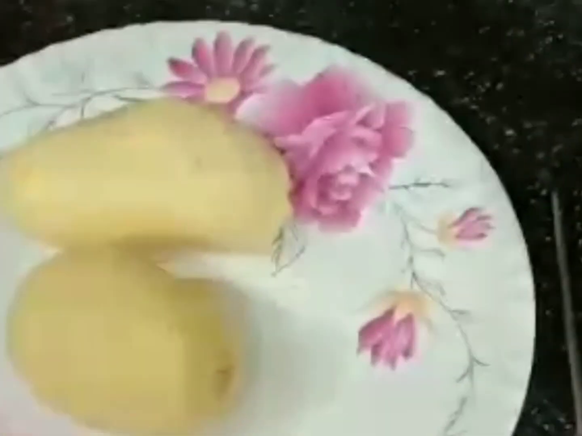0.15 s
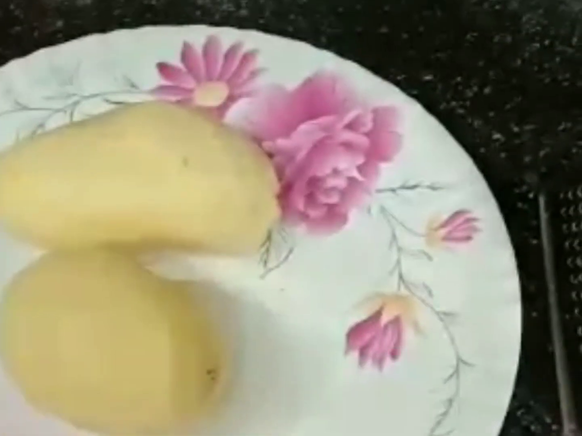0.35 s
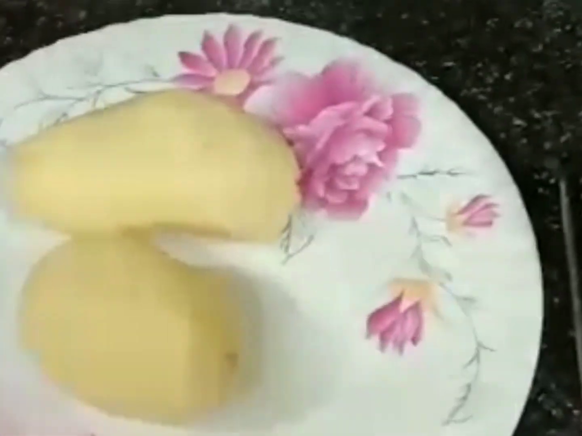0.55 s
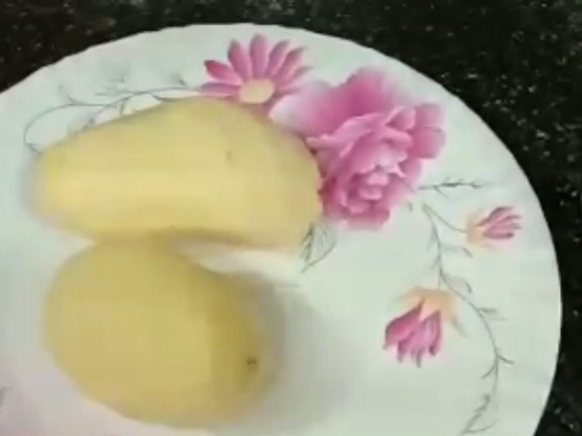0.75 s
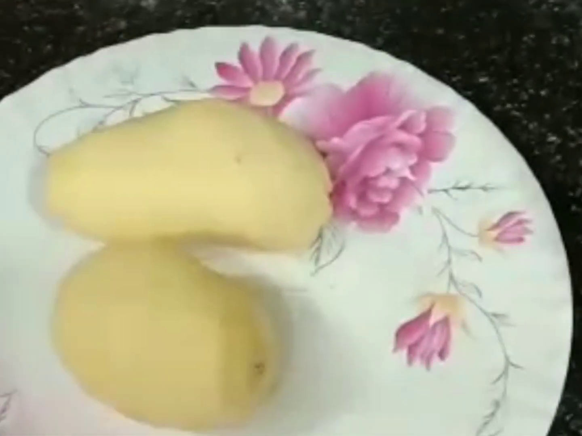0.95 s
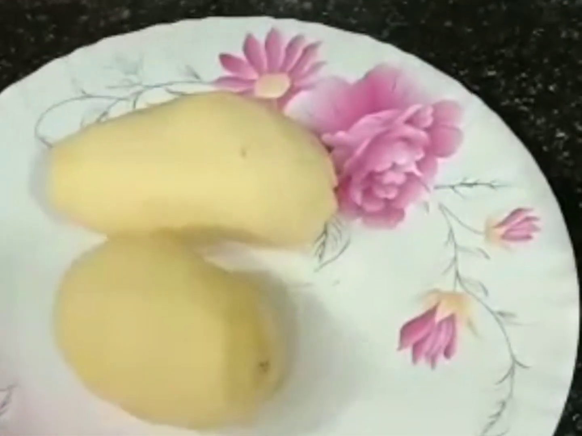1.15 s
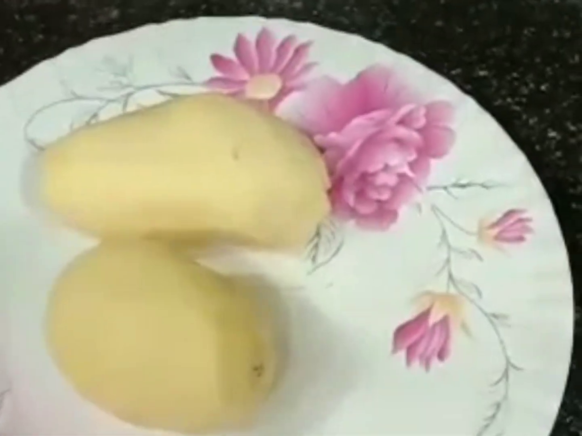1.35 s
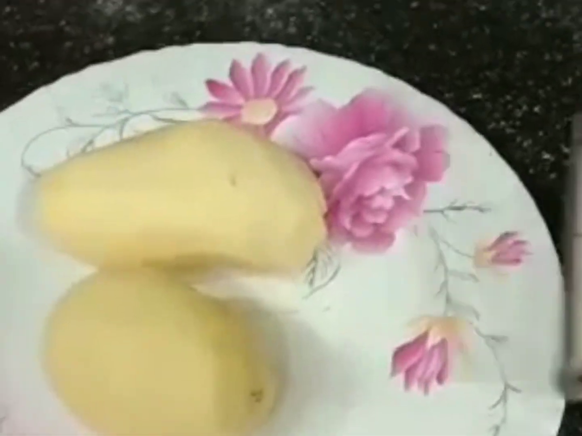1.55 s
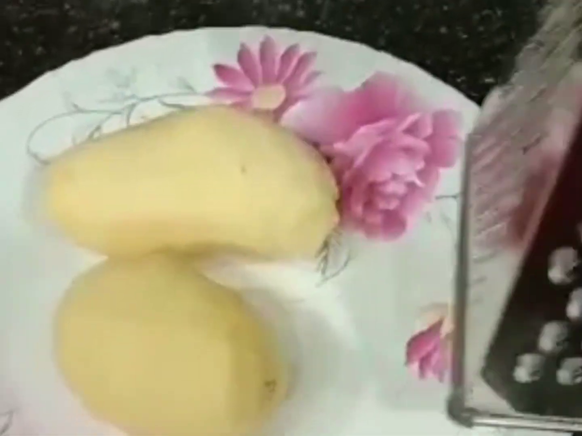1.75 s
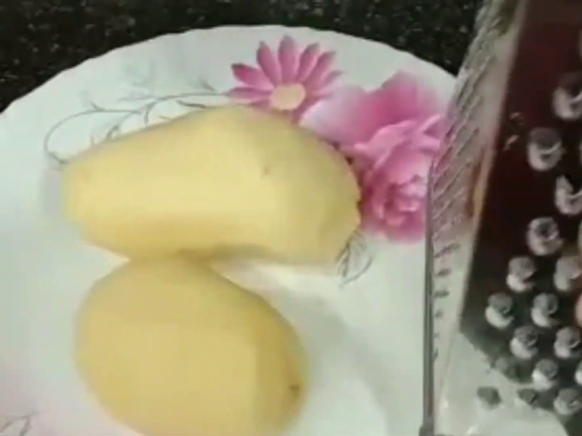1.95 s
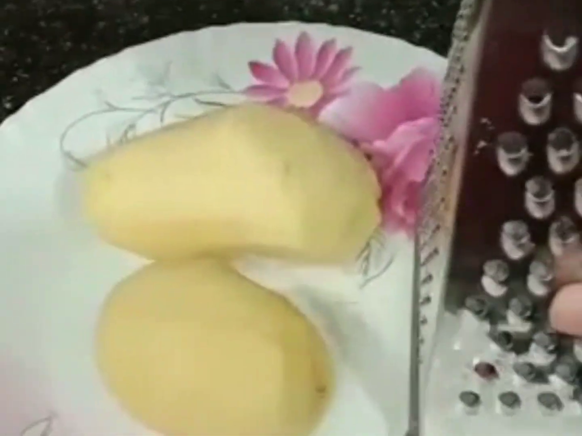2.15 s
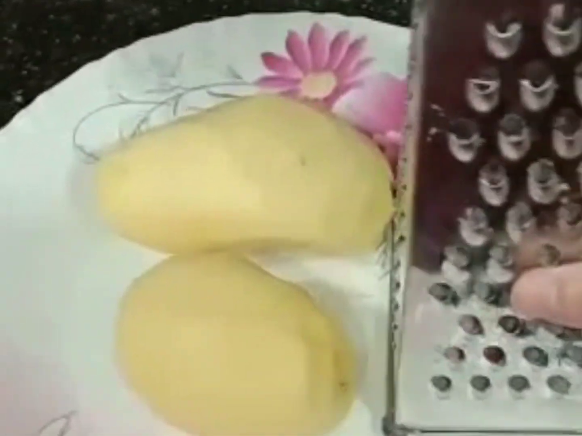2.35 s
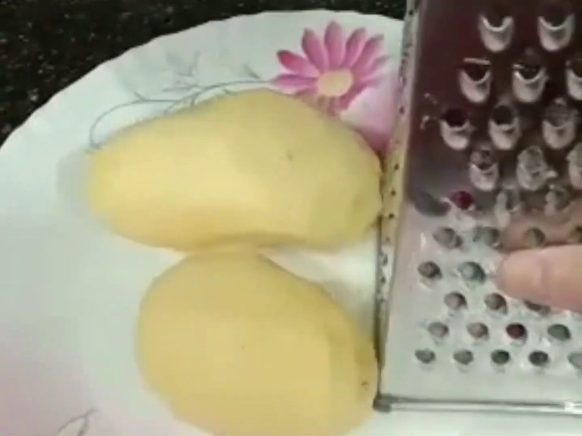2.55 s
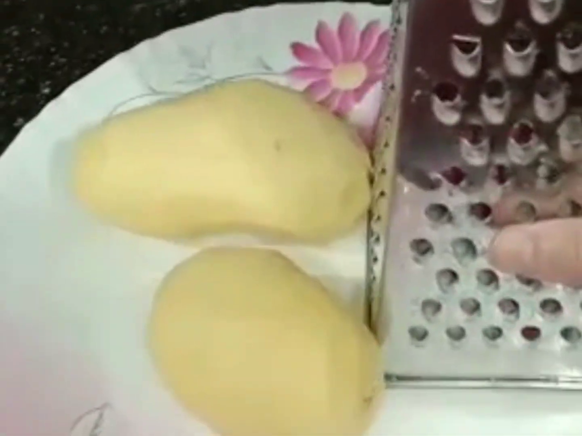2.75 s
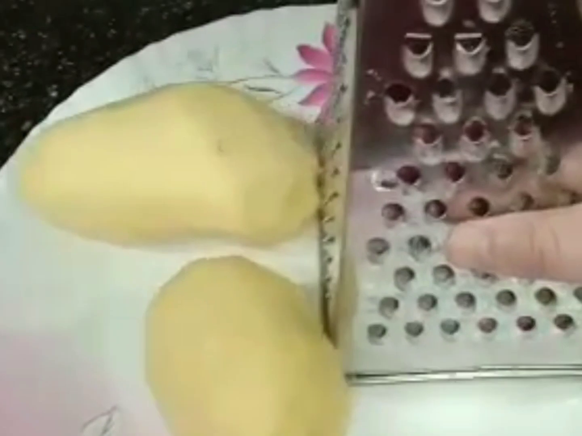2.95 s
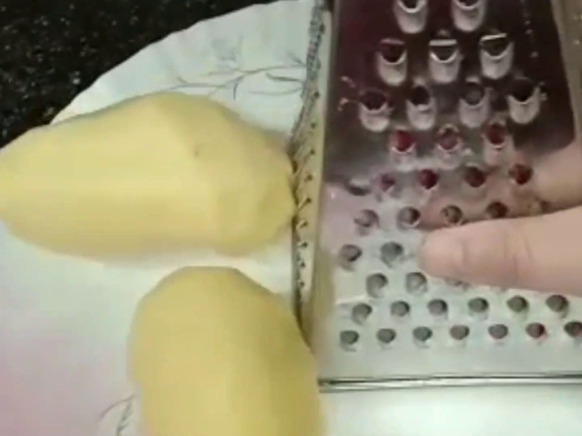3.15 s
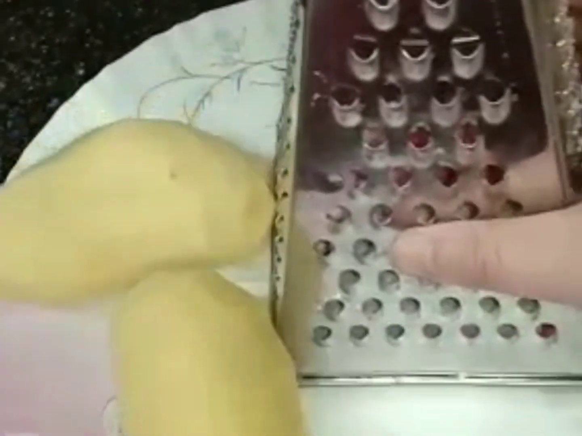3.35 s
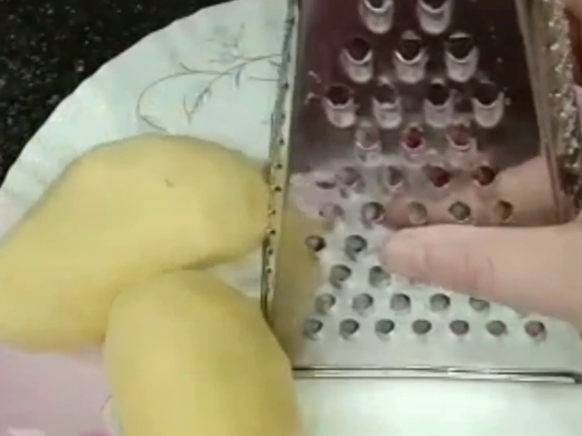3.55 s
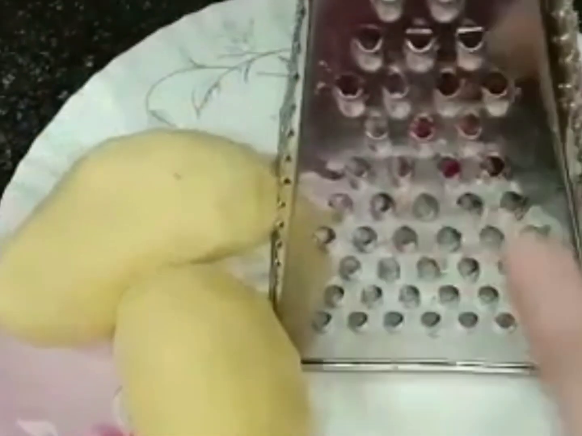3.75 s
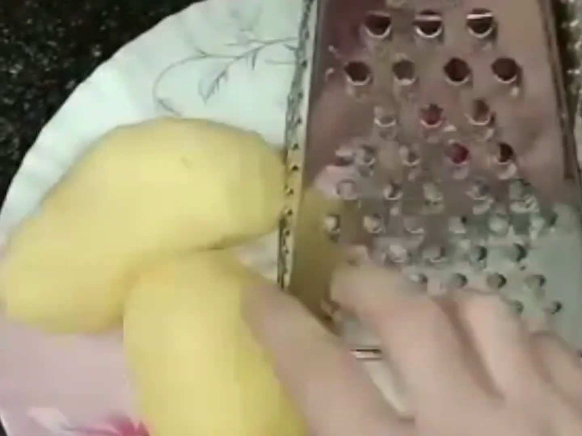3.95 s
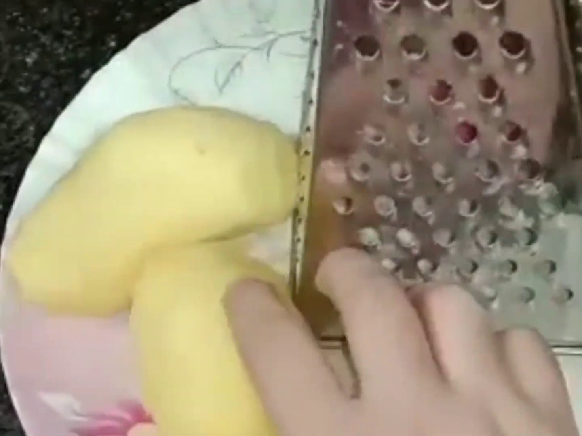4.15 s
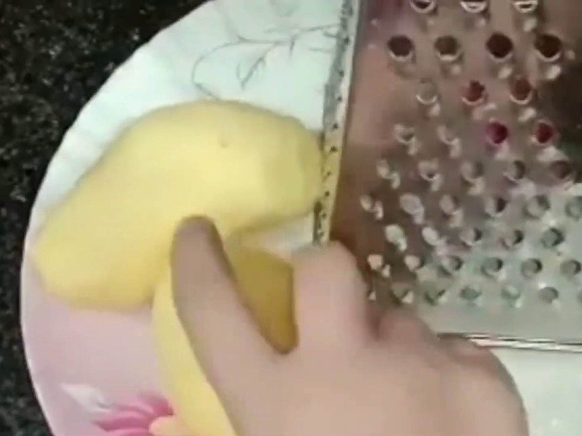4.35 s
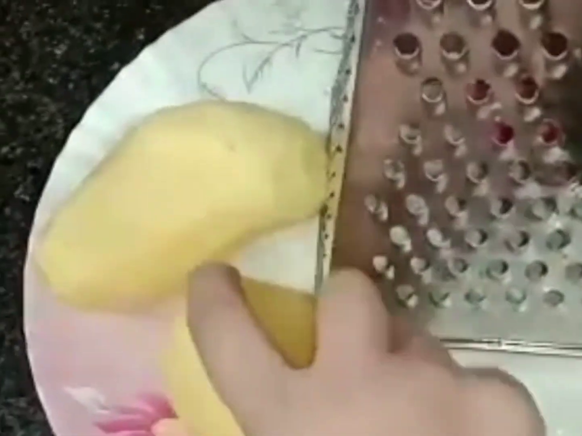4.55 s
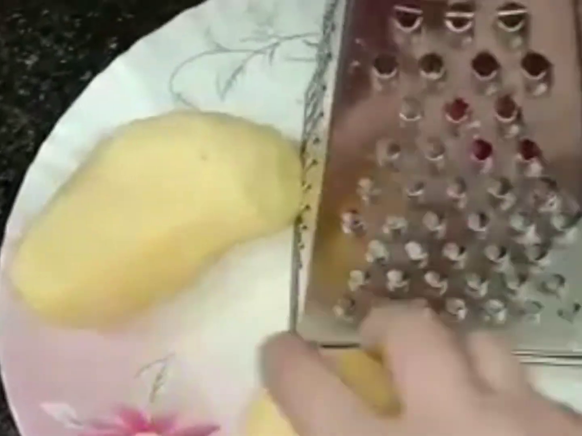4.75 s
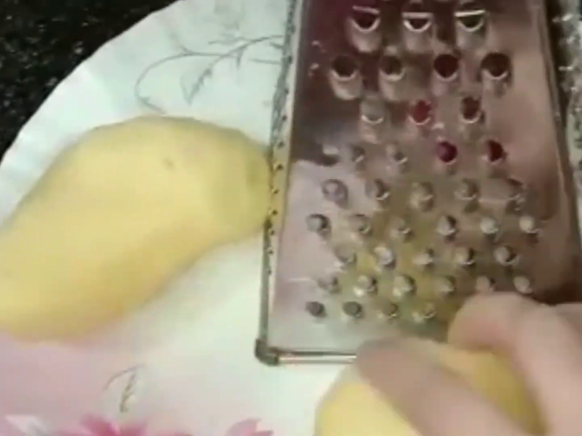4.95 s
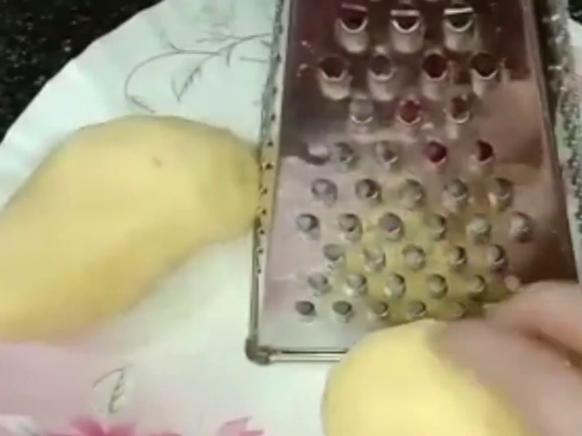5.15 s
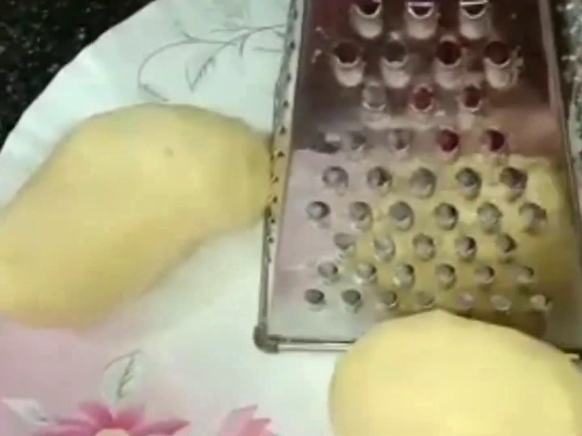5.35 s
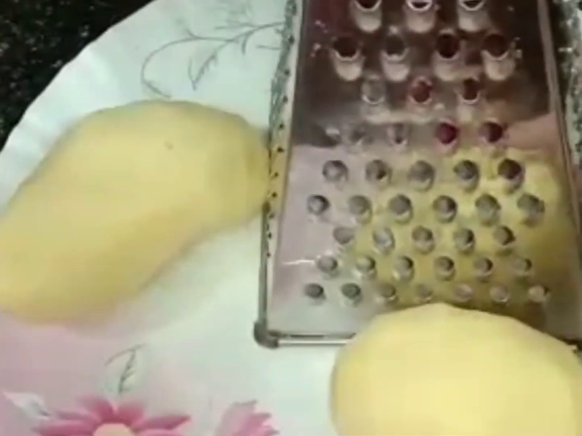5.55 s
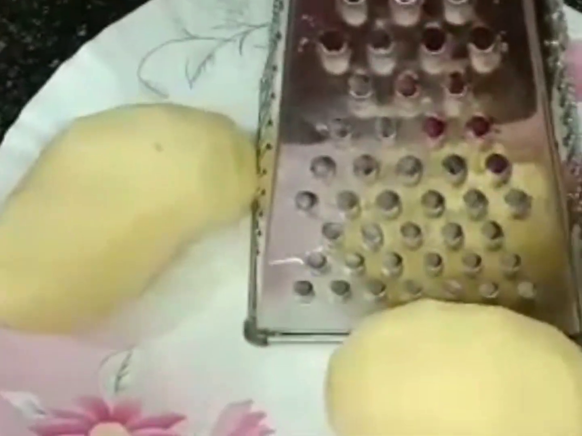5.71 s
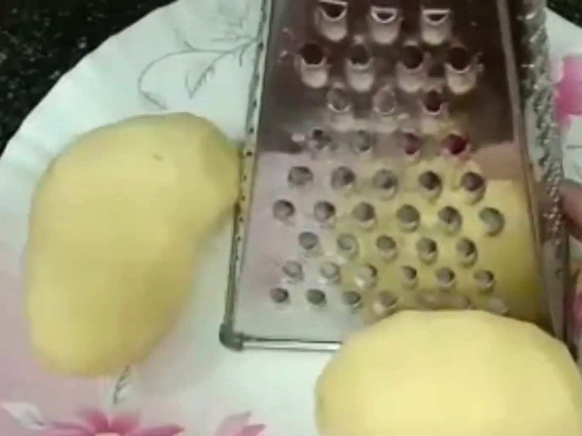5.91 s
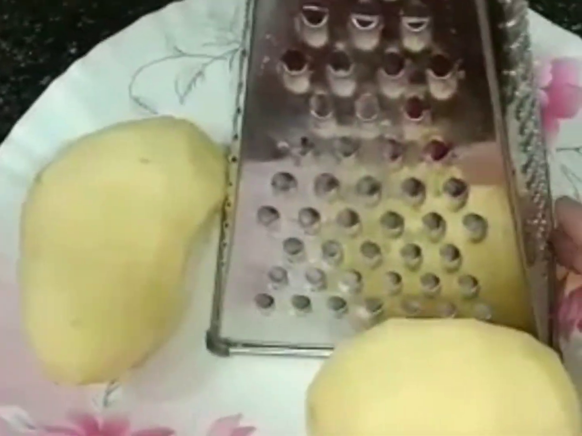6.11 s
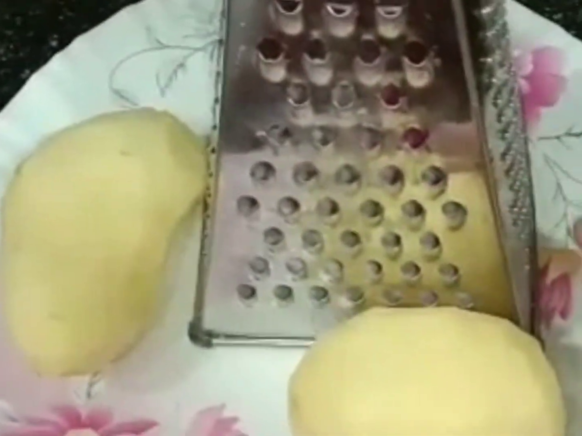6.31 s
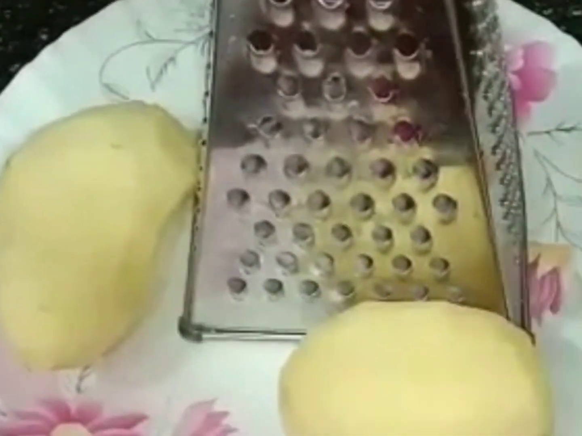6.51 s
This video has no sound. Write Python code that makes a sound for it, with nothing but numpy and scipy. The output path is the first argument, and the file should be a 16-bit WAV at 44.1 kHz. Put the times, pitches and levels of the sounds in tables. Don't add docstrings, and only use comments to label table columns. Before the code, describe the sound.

Close in a small hard kitchen, faint hiss and a few soft bumps and rubs come first. Then a hollow steel grater lands on a ceramic plate with two loud bright clanks, rattling on, clattering and scraping across the glaze. After it stops, a lighter metallic clatter, small taps and gentle rubs of skin and potato follow, fading to quiet. The sound is nearly mono with short room reflections.

```python
import sys
import numpy as np
from scipy import signal
from scipy.fft import rfft, irfft
from scipy.io import wavfile
from scipy.ndimage import uniform_filter1d

SR = 44100
rng = np.random.default_rng(int(sys.argv[2]) if len(sys.argv) > 2 else 0)


def field_ratio(decibels):
    return 10 ** (np.asarray(decibels, dtype=float) / 20)


def int16_out(signal):
    q = np.round(np.clip(np.atleast_2d(signal).T, -1, 1) * 32767)
    wavfile.write(sys.argv[1], SR, q.astype(np.int16))


N = 290028


def rms_one(x):
    return x / np.sqrt(np.mean(x ** 2) + 1e-30)


def band(x, low_hz, high_hz):
    return signal.sosfilt(signal.butter(2, [low_hz, high_hz], "band", fs=SR, output="sos"), x)


def ring(x, hz, t60):
    radius = field_ratio(-60 / (t60 * SR))
    angle = 2 * np.pi * hz / SR
    return signal.lfilter([0, np.sin(angle)], [1, -2 * radius * np.cos(angle), radius ** 2], x)


def wander(per_s):
    knots = rng.standard_normal(200)
    return np.interp(np.arange(N) * per_s / SR, np.arange(200), knots)


def grains(per_s, spread_db):
    sizes = field_ratio(spread_db * np.minimum(rng.exponential(1, N), 4.5))
    signs = rng.choice([-1, 1], N)
    return rms_one(sizes * signs * (rng.random(N) < per_s / SR))


def crack(force, low_hz, high_hz):
    return band(force, low_hz, high_hz) / np.sqrt(2 * (high_hz - low_hz) / SR)


def spread(level_db, focus):
    away = np.arange(4)[:, None] - focus
    loss_db = np.where(away < 0, 12.5, 7.5)
    rounding = 0.4
    return field_ratio(level_db - (np.hypot(away, rounding) - rounding) * loss_db)


def levels(strokes):
    gain, t = np.zeros((4, N)), np.arange(N) / SR
    for s, level_db, focus, rise_s, fall_s in strokes:
        at = slice(max(round((s - 2 * rise_s) * SR), 0), round((s + 2 * fall_s) * SR))
        loss_db = 30 * np.maximum((s - t[at]) / rise_s, (t[at] - s) / fall_s)
        gain[:, at] += spread(level_db - loss_db, focus)
    return uniform_filter1d(gain, size=400, axis=1)


def sudden(rows):
    return [(s, level_db, focus, 0.012, fall_s) for s, level_db, focus, fall_s in rows]


# low edge in Hz, high edge in Hz, level of the unrung crack in dB.
REGISTERS = [(120, 260, -3), (260, 900, 0), (900, 2250, .5), (2500, 8000, 1)]


def contacts(events):
    force, age = np.zeros((4, N)), np.arange(5000) / SR
    grit = grains(14000, spread_db=-2.0)
    register = np.arange(4)
    counter_loss_db = 5 * (register == 0)
    for s, top_db, focus, narrow_db, chatter_s in events:
        at = round(s * SR)
        envelope = np.exp(-age / max(chatter_s, 3e-4)) * (1 - np.exp(-age / 0.0006))
        burst = grit[at:at + len(age)] * envelope
        peaks_db = top_db - narrow_db * (register - focus) ** 2 - counter_loss_db
        for f, peak_db, (low_hz, high_hz, _) in zip(force, peaks_db, REGISTERS):
            f[at:at + len(age)] += field_ratio(peak_db + 1.0) * burst / np.abs(crack(burst, low_hz, high_hz)).max()
    return force


def notes(rows, t60):
    out, age = np.zeros(N), np.arange(SR // 3) / SR
    for s, hz, db in rows:
        at = round(s * SR)
        note = rms_one(ring(rng.standard_normal(len(age)), hz, 0.075))
        out[at:at + len(age)] += (field_ratio(db - 60 * age / t60) * note)[:N - at]
    return out


def coloured(spectrum):
    hz, level_db = np.transpose(spectrum)
    grid = np.log(np.fft.rfftfreq(N, 1 / SR) + 1)
    gain = field_ratio(np.interp(grid, np.log(hz), level_db))
    return rms_one(irfft(rfft(rng.standard_normal(N)) * gain, N))


# frequency in Hz, density in dB per Hz.
HUSH = [(18, -76), (30, -44.5), (56, -2), (85, 0.5), (292, -14), (389, -14), (492, -16.5), (639, -17),
        (691, -25), (787, -17.5), (1260, -25.5), (1550, -24.5), (5170, -27.5), (8280, -33), (15500, -41)]
# frequency in Hz, density in dB per Hz.
HUSH_SIDE = [(15, -50), (25, -18), (120, -7), (263, -7.5), (309, -11), (1260, -7), (1560, -8.5),
             (14800, -23.5), (16000, -22)]
# centre in Hz, width in Hz, level in dB.
HUMS = [(675.2, 22, -85), (1236, 85, -81), (5960, 860, -87), (7200, 500, -96.5), (14940, 1800, -87)]


def hush():
    mid = field_ratio(-70.5) * coloured(HUSH)
    for hz, width_hz, level_db in HUMS:
        hum = band(rng.standard_normal(N), hz - width_hz / 2, hz + width_hz / 2)
        mid = mid + field_ratio(level_db) * rms_one(hum)
    return mid + field_ratio(-78.5) * coloured(HUSH_SIDE) * np.array([[1], [-1]])


# start in seconds, peak in dB, focus register,
# narrowness in dB per register squared, chatter time in seconds.
RATTLES = [
    (0.591, -63, 2.0, 2.5, 0.0375),
    (3.494, -42.5, .9, 8.5, 0.0107),
    (3.917, -30, 2.567, 4.5, 0.0157),
    (3.948, -46.5, 2.41, 4.5, 0.014),
    (4.478, -62, 2.64, 0.5, 0.0116),
    (4.512, -49, 3.27, 10, 0.0195),
    (4.973, -45, 1.63, 13.5, 0.0227),
    (5.181, -36.5, 3.1, 7, 0.0153),
    (5.411, -48, 3.24, 3.5, 0.0283),
]


def rattles():
    return contacts(RATTLES)


# start in seconds, frequency in Hz, level in dB.
PINGS = [(.755, 644.7, -57), (.76, 1251, -48.5), (.947, 1212, -47), (.96, 6170, -61), (2.1, 734.6, -36),
         (2.1, 2967, -28.5), (2.36, 576.4, -29), (2.36, 807, -50.5), (2.87, 7216, -32), (2.87, 6323, -35),
         (3.17, 195, -61), (3.497, 480, -59), (3.92, 1306, -37.5), (4.48, 1273, -52), (4.48, 3675, -62),
         (4.51, 5950, -53), (4.597, 784, -50.5), (4.63, 367.3, -42), (4.8, 3474, -68), (4.975, 1278, -53),
         (5.05, 2888, -69.5), (5.185, 1279, -49), (5.183, 2235, -51), (4.976, 2054, -58),
         (5.413, 2350, -65), (5.45, 1332, -56), (5.6, 3504, -67.5), (5.69, 1760, -62.5),
         (5.775, 989, -52.5)]


def pings():
    return notes(PINGS, t60=0.13)


# start in seconds, peak in dB, focus register,
# narrowness in dB per register squared, chatter time in seconds.
TAPS = [(0.762, -63, 2.35, 0.5, 0.0041), (0.846, -45.5, 2.62, 5.5, 0.00296),
        (1.165, -40.5, 0.854, 10.5, 0.0075), (2.096, -11.5, 3.237, 2.5, 0.001895),
        (2.36, -9.5, 2.044, 6, 0.00343), (2.433, -18.5, 2.95, 5, 0.00215), (2.465, -24, 1.07, 9, 0.00234),
        (2.539, -26, 2.3, 8.5, 0.00616), (2.767, -24.5, 2.1, 5.5, 0.0061), (2.855, -33, 1.5, 2.28, 0.0083),
        (2.867, -26.5, 2.23, 4.5, 0.0063), (2.914, -18.5, 1.72, 14.0, 0.00078),
        (2.947, -31.5, 1.56, 10.5, 0.0045)]


def taps():
    return contacts(TAPS)


# peak time in
# seconds, level in dB, focus register, time of a 30 dB rise in seconds, time of a 30 dB fall in seconds
RUBS = [(.616, -73.5, 1.6, -3.02, .15), (.86, -58, 1.2, .13, 0.0476), (1.17, -53, 1.2, .07, .09),
        (1.165, -61, 3.2, .1, .06), (1.12, -63.5, 2.32, 0.1461, 0.0767),
        (1.97, -71, 3.5, .45, .6)  , (2.35, -48.5, 2.24, 0.1288, 0.5343), (3.678, -73.5, 3.05, 0.06, 0.01),
        (4.27, -65, .9, .1, .12), (4.52, -60.5, 2.64, -0.22, 0.05), (4.77, -68, 3.2, .25, .35),
        (4.18, -65, 2.47, .07, .22), (5.95, -63.5, 2.3, 0.0335, -0.0383), (5.62, -72, 3.22, 0.19, 0.25),
        (5.728, -50, 2.73, 0.0513, 0.0728), (5.85, -70, 2.31, 0.08, .2), (6.5, -66, 2.634, 0.2132, 1)]
# start in seconds, level in dB, focus register,
# time to lose 30 dB in seconds.
DRAGS = [(.765, -63, 2.43, 0.03), (.95, -53, .8, .15), (3.5, -54, 1.503, 0.1578),
         (3.955, -51.5, 2.14, 0.1566), (4.485, -63.5, 2.24, 0.12), (4.6, -50.5, 3, 0.0327),
         (4.632, -48, 0.94, 0.0982), (4.978, -55.5, 2.17, 0.1143), (5.195, -54.5, 2.2, 0.069),
         (5.417, -57, 1.9, 0.0865), (5.776, -49.5, 0.887, 0.0525), (5.91, -59, 1.274, 0.1562)]


def hands():
    return levels(RUBS + sudden(DRAGS)) * grains(9000, spread_db=2.5)


# start in seconds, peak in dB, focus register,
# narrowness in dB per register squared.
TICKS = [
    (0.81, -43, 1.7, 4.0),
    (0.945, -41.5, 0.78, 1.5),
    (3.662, -59, 2.8, 4.5),
    (4.564, -42, 3.43, 6.5),
    (4.597, -35, 3.35, 18),
    (4.628, -45.5, 0.54, 0),
    (5.462, -54.5, 2.63, 4.5),
    (5.772, -39.5, 1.27, 2.5),
    (5.908, -52, 1.27, 9.5),
]


def ticks():
    return contacts([(*tick, 0.00134) for tick in TICKS])


# start in seconds, frequency in Hz, peak in dB.
THUDS = [(.85, 260.3, -58), (.95, 280, -46), (1.164, 290, -47), (2.104, 125, -39.5), (2.375, 119.3, -36),
         (2.79, 130, -42.5), (3.497, 205.2, -50), (4.269, 336.4, -60), (4.64, 259, -54.5),
         (4.99, 296.6, -55), (5.44, 151, -55), (5.78, 198, -58)]


def thuds():
    out, age = np.zeros(N), np.arange(SR // 4) / SR
    rise_s, t60_s = 0.011, 0.12
    for s, hz, db in THUDS:
        at = round(s * SR)
        envelope = field_ratio(db - 60 * age / t60_s) * (1 - np.exp(-age / rise_s))
        out[at:at + len(age)] += envelope * np.sin(2 * np.pi * hz * age)
    return out


def glints(force):
    t60_s, count = 0.045, 16
    pitches = np.geomspace(3100, 7500, count) * rng.uniform(0.98, 1.02, count)
    unit = np.sqrt(t60_s * SR / 27.6 * count)
    rung = sum(ring(force * field_ratio(5.5 * wander(28)) + 1e-18, hz, t60_s) for hz in pitches)
    return field_ratio(-7.5) / unit * rung


# start in seconds, frequency in Hz, level in dB.
SINGS = [(2.1, 152, -44.5), (2.37, 152.4, -41), (2.56, 142.7, -46.5), (3.07, 7567, -50),
         (3.12, 2085, -49.5), (3.55, 288.3, -54.5), (3.925, 263.8, -50.5), (4.16, 3648, -65),
         (4.6, 7200, -68), (4.72, 4836, -73), (4.75, 4225, -71), (4.79, 6120, -65.5), (5.182, 2973, -54.5),
         (5.19, 1546, -50.5), (5.19, 250, -62.5), (5.85, 5900, -74.5), (5.86, 4300, -67),
         (5.91, 1001, -58.5), (6.46, 3350, -68.5), (6.48, 5140, -68.5)]


def sings():
    return notes(SINGS, t60=0.23)


# start in seconds, level in dB, focus register,
# time to lose 30 dB in seconds.
SHIVERS = [
    (2.106, -31, 1.7, 0.2229),
    (2.368, -28.5, 1.88, 0.1612),
    (2.44, -34.5, 1.676, 0.2413),
    (2.545, -46.5, 1.57, 0.2334),
    (2.775, -44, 0.523, 0.421),
    (2.87, -43.5, 0.547, 0.248),
]


def shivers():
    return levels(sudden(SHIVERS)) * grains(9000, spread_db=1.5) * field_ratio(-1.5)


# time in seconds, pressure in dB, focus register.
SLIDE = [
    (2.58, -55.5, 2.83),
    (2.66, -49.5, 2.475),
    (2.76, -43, 2.79),
    (2.87, -37.5, 2.437),
    (2.95, -38, 2.425),
    (3.02, -45, 2.417),
    (3.14, -43.5, 2.289),
    (3.391, -57.5, 2.07),
    (3.442, -73, 1.61),
]


def slide():
    s, pressure_db, focus = np.transpose(SLIDE)
    t = np.arange(N) / SR
    push = spread(np.interp(t, s, pressure_db, -200, -200), np.interp(t, s, focus))
    return push * grains(7000, spread_db=2.7) * field_ratio(-4)


def body(force, modes, low_hz, high_hz, crack_db):
    click = signal.unit_impulse(SR // 2)
    power, rung = 0, 0
    for hz, db, t60 in modes:
        power = power + np.sum((field_ratio(db) * ring(click, hz, t60)) ** 2)
        rung = rung + field_ratio(db) * ring(force * field_ratio(3.8 * wander(22)) + 1e-18, hz, t60)
    rung = band(rung, low_hz / 1.5, high_hz * 1.757) / np.sqrt(power)
    return 0.541 * (rung + field_ratio(crack_db) * crack(force, low_hz, high_hz))


# frequency in Hz, level in dB, t60 in seconds.
COUNTER = [(125, -8, 0.24), (152, 1.5, 0.19), (187, -4, 0.12)]
# frequency in Hz, level in dB, t60 in seconds.
PLATE = [(308, -6, 0.09), (387, -2.5, 0.064), (443.6, -2.5, 0.15), (507, -6.5, 0.095), (586, -2.5, 0.13),
         (672, 3.5, .07), (752.4, 5, 0.11), (865.3, 13, 0.03)]
# frequency in Hz, level in dB, t60 in seconds.
WALLS = [(951.2, -1, 0.017), (1185, -9.5, 0.045), (1229.6, -10, 0.11), (1289.7, -6.5, 0.14),
         (1313.9, -2, 0.11), (1466.4, -10.5, .1), (1570.5, -15, 0.2), (1774, -11.5, 0.041),
         (1922.2, -6.5, 0.045), (1994, -6, 0.083), (2124.8, -4.5, .07), (2189.5, -10, .07),
         (2444.3, -3, 0.032), (2350, -8, .06), (2633, -9.5, 0.1), (2892, -7, 0.078), (3240, -23, .06)]
# frequency in Hz, level in dB, t60 in seconds.
TEETH = [(3532, -8.5, 0.065), (3702, -1, 0.024), (4129, -1, 0.028), (4432, 0, 0.023), (4634, -2.5, .04),
         (4989, 2, 0.022), (5400, -4, 0.017), (5781, 7.5, 0.01), (5965, -7.5, 0.043), (6125, -5, 0.027),
         (6356, -8, 0.03), (6460, -12.5, .03), (7167, -6.5, 0.056), (7130, -9, 0.011), (7285, -8.5, 0.014)]


def bodies(force):
    parts = zip(force, (COUNTER, PLATE, WALLS, TEETH), REGISTERS)
    return sum(body(f, modes, *register) for f, modes, register in parts)


# frequency in Hz, t60 in seconds.
KITCHEN = [(150, 0.36), (400, 0.31), (1200, 0.2757), (3000, 0.282), (7000, 0.2343)]


def kitchen(x):
    age = np.arange(round(0.6 * SR)) / SR
    white = rng.standard_normal((2, len(age)))
    tail = sum(band(white, hz / 1.6, hz * 1.6) * field_ratio(-60 * age / t60) for hz, t60 in KITCHEN)
    tail = tail * (1 - np.exp(-age / 0.0058))
    return signal.fftconvolve(x[None], tail / np.sqrt(np.sum(tail[0] ** 2)), axes=1)[:, :N]


def microphone(x, fine):
    x = signal.sosfilt(signal.butter(4, 108, "high", fs=SR, output="sos"), x)
    main = signal.sosfilt(signal.cheby2(8, 45, 9200, fs=SR, output="sos"), x)
    port = field_ratio(-18) * band(fine, 8200, 11500)
    air = field_ratio(-15) * band(band(fine, 14300, 16200), 14300, 16200)
    return main + port + air


def scene():
    knocks, rattling = taps() + ticks(), rattles()
    rubbing, shiver = slide() + hands(), shivers()
    near = bodies(knocks + rattling + rubbing + shiver)
    near = near + pings() + sings() + thuds() + glints(rubbing[3])
    room, across = kitchen(near)
    fine = field_ratio(-4) * knocks[3] + field_ratio(5.5) * rattling[3]
    fine = fine + rubbing[3] * field_ratio(2.9 * wander(13)) + field_ratio(-6) * shiver[3]
    heard = near + field_ratio(-8) * room + field_ratio(-45.0) * across * np.array([[1], [-1]])
    return microphone(heard, fine) + hush()


def top_cut(x):
    return signal.sosfilt(signal.butter(12, 16460, fs=SR, output="sos"), x)


def record(dry):
    mix = signal.sosfilt(signal.cheby2(10, 36, 15800, fs=SR, output="sos"), dry)
    return top_cut(mix)


dry = scene()
out = record(dry)
int16_out(out)
```